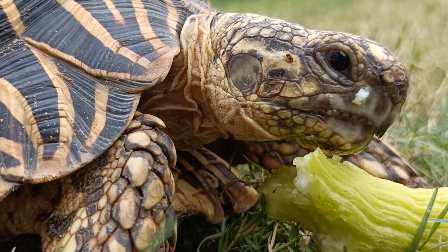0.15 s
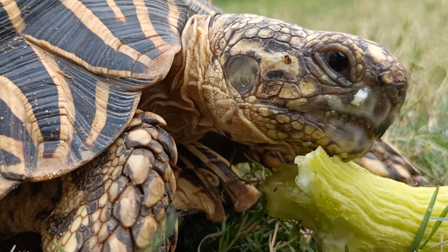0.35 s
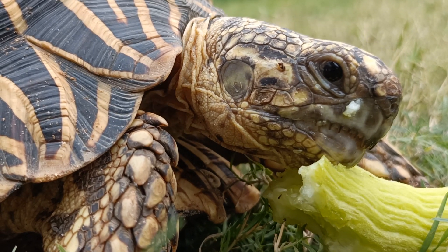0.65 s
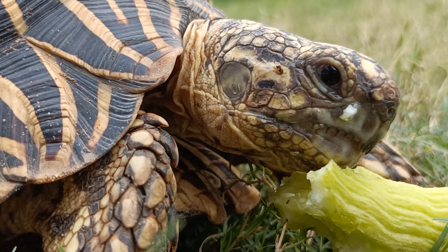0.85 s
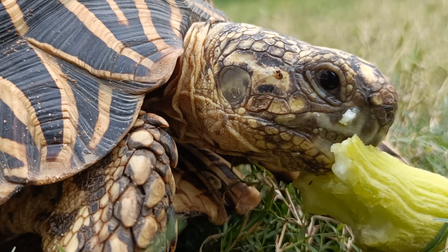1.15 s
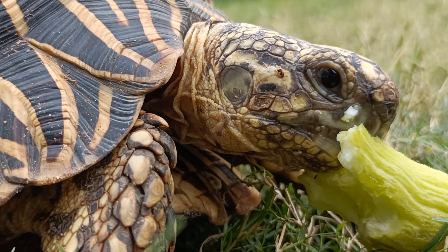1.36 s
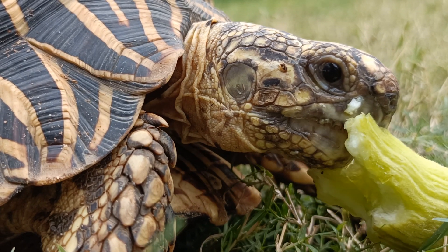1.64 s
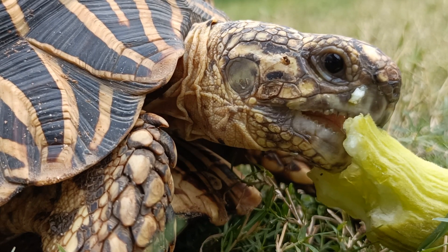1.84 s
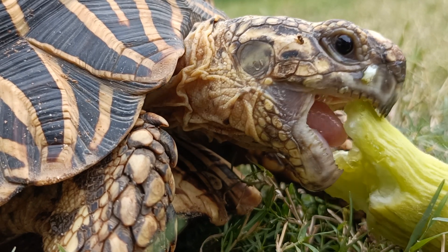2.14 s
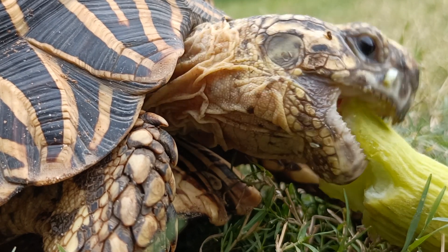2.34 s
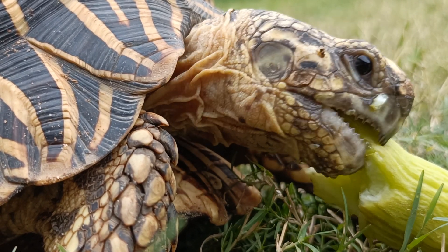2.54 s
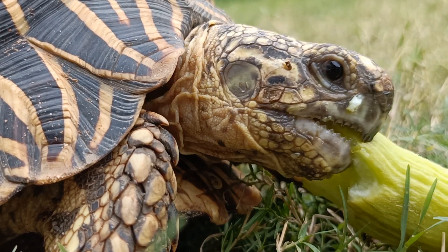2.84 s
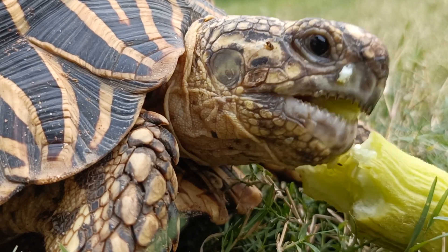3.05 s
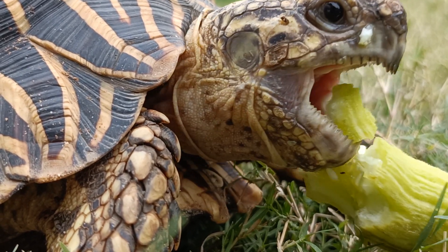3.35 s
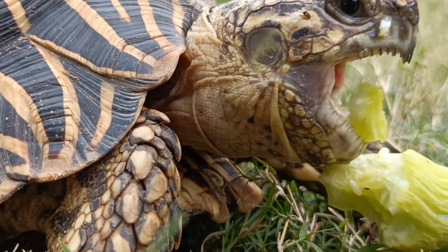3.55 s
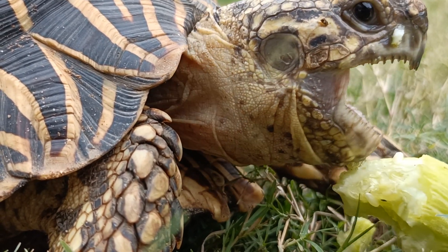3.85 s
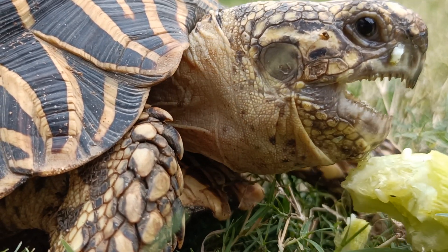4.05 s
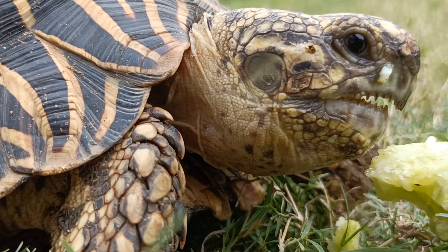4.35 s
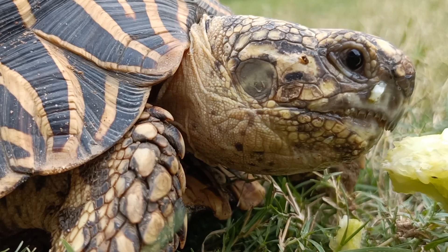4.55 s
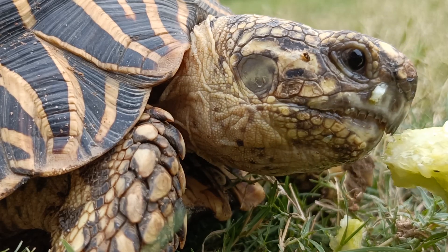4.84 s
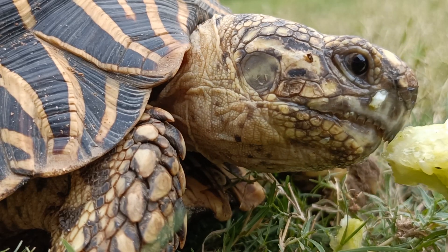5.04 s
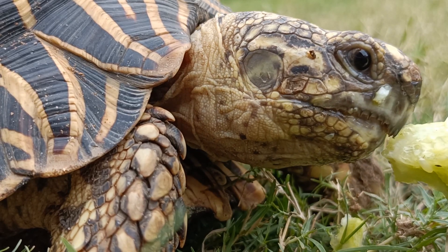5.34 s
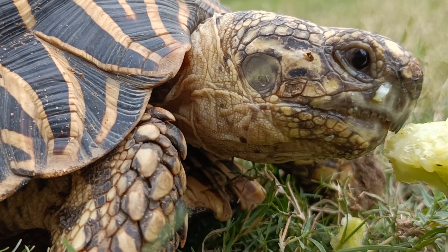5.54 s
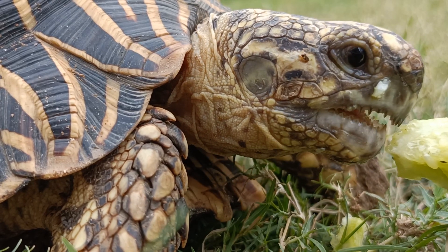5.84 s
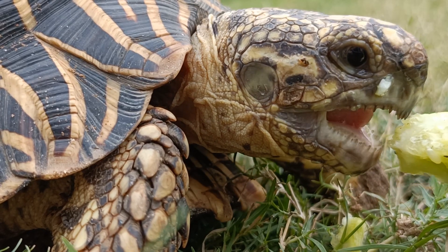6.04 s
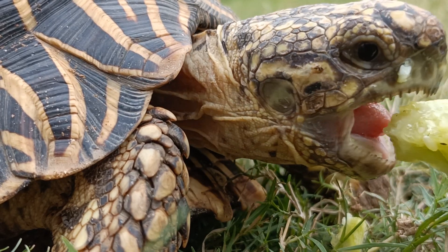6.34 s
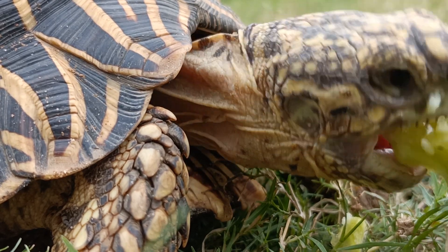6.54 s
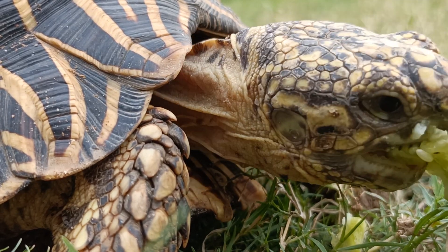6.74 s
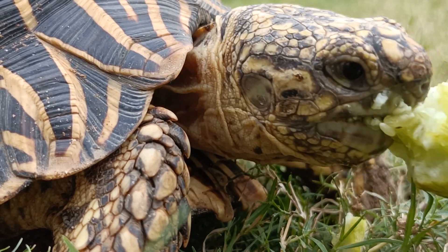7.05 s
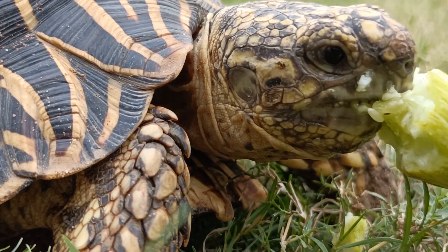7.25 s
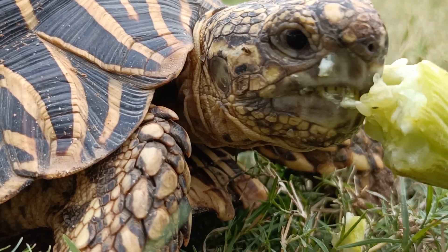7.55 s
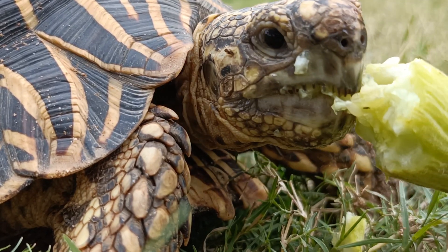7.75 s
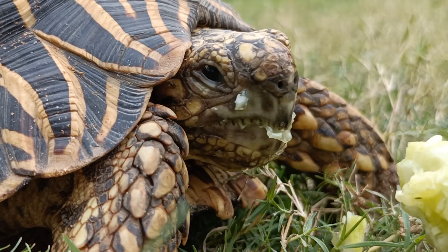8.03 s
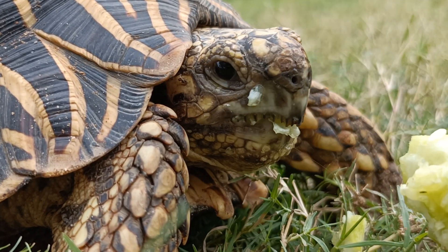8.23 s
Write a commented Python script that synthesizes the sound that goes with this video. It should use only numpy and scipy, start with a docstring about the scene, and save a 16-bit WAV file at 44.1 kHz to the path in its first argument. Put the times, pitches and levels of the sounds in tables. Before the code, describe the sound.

A tortoise bites into cucumber right in front of a microphone lying in the grass. At first, stems crackle and tick against the microphone on the right, with a few soft bumps. A sharp, snapping bite comes about three seconds in, followed by more grass ticks and a second, slightly longer crunch near seven seconds. Parrot-like birds squawk in distant trees over a faint swelling hiss and a low outdoor rumble.

```python
"""Tortoise eating cucumber on a lawn

A camera lies in the grass, its two microphone ports right in front of a tortoise that takes two bites.
Each bite is a short run of snaps that ring in the mouth. Stems tick and crackle against the camera,
which gets a few soft bumps. Farther off, parrot-like birds squawk in the trees, and behind it all
a high hiss swells and fades over a low outdoor rumble."""
import sys
import numpy as np
from scipy import signal
from scipy.fft import rfft, irfft, next_fast_len
from scipy.io import wavfile
from scipy.ndimage import uniform_filter1d

SR = 44100
rng = np.random.default_rng(int(sys.argv[2]) if len(sys.argv) > 2 else 0)


def inscribe(sig):
    """Save sig as 16-bit PCM at rate SR to the path in sys.argv[1].

    A 1-D sig is mono; a 2-D sig holds one channel per row.
    Samples are clipped to [-1, 1] before scaling.
    """
    pcm = np.round(np.clip(np.atleast_2d(sig).T, -1, 1) * 32767)
    wavfile.write(sys.argv[1], SR, pcm.astype(np.int16))


N = 369999


def gain_of(db):
    """Decibels to a factor."""
    return 10 ** (np.asarray(db) / 20)


def unit_rms(x):
    """Scales to rms 1."""
    return x / np.sqrt(np.mean(x ** 2) + 1e-20)


def spectrum_at(points, hz):
    """Reads a spectrum on a log-frequency axis."""
    f, value = np.transpose(points)
    return np.interp(np.log(hz + 1), np.log(f + 1), value)


def envelope(curve):
    """A curve of (time [s], level [dB]) as a gain for every sample."""
    return gain_of(np.interp(np.arange(N) / SR, *np.transpose(curve)))


def add(mix, s, sound):
    """Adds a sound to the mix at time s."""
    part = mix[..., max(round(s * SR), 0):][..., :sound.shape[-1]]
    part += sound[..., :part.shape[-1]]


def panned(balance_db):
    """Gains at the two microphone ports; a positive balance favours the left."""
    return unit_rms(gain_of([[balance_db / 2], [-balance_db / 2]]))


def coloured(x, points, size=4096):
    """Causal (minimum-phase) filter with the given spectrum."""
    log_gain = np.log(gain_of(spectrum_at(points, abs(np.fft.fftfreq(size, 1 / SR)))))
    taps = np.fft.ifft(np.exp(np.conj(signal.hilbert(log_gain)))).real[:size // 2]
    return signal.fftconvolve(x, taps[None], axes=1)[:, :x.shape[1]]


def drift(count, per_s):
    """A smooth random curve of rms 1 that changes about per_s times a second."""
    width = max(int(SR / per_s), 1)
    return unit_rms(uniform_filter1d(uniform_filter1d(rng.standard_normal(count), width), width))


def swell(width_s):
    """A smooth rise and fall, from three half widths before its middle to three after."""
    return np.exp(-np.linspace(-3, 3, int(6 * width_s * SR)) ** 2 / 2)


def slips(per_s, spread_db):
    """Tiny clicks of very uneven size, at rms 1."""
    size = gain_of(spread_db * np.minimum(rng.exponential(1, N), 3)) * rng.choice([-1, 1], N)
    return unit_rms(size * (rng.random(N) < per_s / SR))


def crack(decay_s, tilt_db, splinters, size=1024):
    """One break and a dying spray of smaller ones, with the energy of 1 ms at rms 1."""
    t = np.arange(size) / SR
    spray = rng.standard_normal((2, size)) * np.exp(-t / decay_s)
    burst = splinters * spray / np.linalg.norm(spray, axis=1, keepdims=True)
    burst[:, 2] += 1  # the break itself
    burst = coloured(burst, [(500, 0), (16000, 5 * tilt_db)], size=512)  # tilt_db per octave
    return unit_rms(burst) * np.sqrt(SR / 1000 / size)


def knock(modes, tilt_db, pivot_hz):
    """Quickly damped modes, each with a little scuff; a harder blow favours those above the pivot."""
    t = np.arange(SR // 5) / SR
    out = np.zeros(len(t))
    for hz, db, decay_s in modes:
        pole = np.exp(-2 * np.pi * hz / SR)
        scuff = unit_rms(signal.lfilter([1], [1, -pole], rng.standard_normal(len(t))))
        strength = gain_of(db + tilt_db * np.log2(hz / pivot_hz))
        out += strength * (np.sin(2 * np.pi * hz * t) + 0.64 * scuff) * np.exp(-t / decay_s)
    return out


# Spectral shapes of the distant rumble and of the open air: (frequency [Hz], relative density [dB])
RUMBLE_SPECTRUM = [(12, -72), (20, -20), (37, -2), (57, -2.5), (87, -6), (108, -6), (174, -8), (202, -8.5),
                   (242, -9), (280, -15.5), (504, -16), (584, -22), (783, -22.5), (1600, -41.5),
                   (2080, -130), (3520, -120)]
AIR_SPECTRUM = [(200, -48), (900, 9.5), (2200, 4), (3500, 6.5), (5500, -35), (8000, -31), (12000, -43),
                (16000, 4)]
# How alike that background is at the two ports: (frequency [Hz], correlation [0-1])
PORT_COHERENCE = [(30, 0.96), (130, 0.89), (260, 0.89), (520, 0.37), (1000, 0.033), (2000, 0.017),
                  (5000, 0.039)]

def outdoors():
    """Distant rumble, its lows nearly alike at both ports, a faint wavering hum and thin air noise."""
    size = next_fast_len(N, real=True)
    hz = np.fft.rfftfreq(size, 1 / SR)
    left, independent = rfft(rng.standard_normal((2, size)))
    coherence = spectrum_at(PORT_COHERENCE, hz)
    field = np.array([left, coherence * left + np.sqrt(1 - coherence ** 2) * independent])
    rumble = unit_rms(irfft(field * gain_of(spectrum_at(RUMBLE_SPECTRUM, hz)), size)[:, :N])
    air = unit_rms(irfft(field * gain_of(spectrum_at(AIR_SPECTRUM, hz)), size)[:, :N])
    hum_hz, hum_level = 62.7, gain_of(-56.5) * (1 + 0.5 * drift(N, per_s=8.2))
    hum = hum_level * np.sin(2 * np.pi * hum_hz * np.arange(N) / SR + 0.41 * drift(N, per_s=2.3))
    return (gain_of(-48.5) * rumble + hum) * panned(-0.092) + gain_of(-67) * air


# Faint hollow swells from far off: (middle [s], half width [s], frequency [Hz], level [dB])
FAR_SWELLS = [(2.08, 0.052, 795, -63.5), (2.359, 0.083, 1497, -69), (3.18, 0.094, 651, -61),
              (5.85, 0.13, 479, -63), (6.22, 0.19, 518.5, -60.5)]

def far_tones():
    """Narrow bands of noise that rise out of the rumble and sink back, dead centre."""
    out = np.zeros(N)
    for s, width_s, hz, db in FAR_SWELLS:
        shape = swell(width_s)
        wobble = drift(len(shape), per_s=230) + 1j * drift(len(shape), per_s=230)
        band = (wobble * np.exp(2j * np.pi * hz * np.arange(len(shape)) / SR)).real
        add(out, s - 3 * width_s, gain_of(db) * shape * band)
    return out


# Swells of background hiss: (middle [s], half width [s], relative level [dB])
HISS_SWELLS = [(.02, 0.047, -67.5), (.62, 0.068, -69), (1.12, 0.053, -72.5), (2.6, 0.096, -80),
               (3.33, 0.11, -63.5), (4.04, 0.072, -64.5), (4.849, 0.15, -63.5), (5.75, 0.12, -63.5),
               (6.74, 0.11, -62.5)]
# Colour of the hiss: (frequency [Hz], gain [dB])
HISS_SPECTRUM = [(300, 5), (1500, -4), (2200, 3), (3000, 5), (4500, 5), (6500, -0.5), (9000, -1),
                 (12000, -8), (16000, -15)]

def hiss():
    """A smooth high hiss, wide across both ports, that swells and fades about once a second."""
    level = np.full(N + SR, gain_of(-87.5))  # a second of lead-in lets the first swell start early
    for s, width_s, db in HISS_SWELLS:
        add(level, 1 + s - 3 * width_s, gain_of(db) * swell(width_s))
    noise = coloured(rng.standard_normal((2, N)), HISS_SPECTRUM)
    return gain_of(9.5) * panned(0.81) * level[SR:] * noise


def tree_echoes(x, t60_s):
    """Scattered echoes from trees and walls: sparse taps that die away, different at each port."""
    t = np.arange(SR) / SR
    taps = rng.standard_normal((2, SR)) * (rng.random((2, SR)) < 1500 / SR)
    early, tail = 1.07 * np.exp(-t / 0.052), gain_of(-60 * t / t60_s)
    taps *= (early + tail) * (t > 0.004)
    return signal.fftconvolve(x, taps / np.linalg.norm(taps, axis=1, keepdims=True), axes=1)[:, :N]


# Resonances of a bird's throat: (frequency [Hz], gain [dB])
THROAT_SPECTRUM = [(1400, -16.5), (2100, 3.5), (2550, 13), (3150, 6), (4100, 11), (5050, 2.5), (6400, -9),
                   (8200, -13.5), (9600, -13), (11000, -24), (14000, -31)]

def bird_note(length_s, last_hz, fall_octaves, rough, bright_db, sag_octaves_per_s=0):
    """A harmonic note that starts high, drops unevenly and levels off while it grows louder."""
    drop_s, rise_db = 0.039, 3.5
    count = int(length_s * SR)
    t = np.arange(count) / SR
    octaves = fall_octaves * np.exp(-(t / drop_s) ** 2) + sag_octaves_per_s * (length_s - t)
    shake = 0.024 * drift(count, per_s=700) + 0.022 * drift(count, per_s=130)
    waver = 0.00906 * drift(count, per_s=140)
    hz = last_hz * 2 ** octaves * (1 + rough * shake + waver)
    phase = 2 * np.pi * np.cumsum(hz) / SR
    voice = np.zeros(count)
    for k in range(1, 7):
        voice += gain_of(spectrum_at(THROAT_SPECTRUM, k * hz) + bright_db * min(k, 3)) * np.sin(k * phase)
    rasp = 1 + rough * drift(count, per_s=1500)
    rise = gain_of(rise_db * (t / length_s) ** 2)
    return unit_rms(voice * rasp * rise) * signal.windows.tukey(count, 0.3)


# Thin whistles from the trees, often leading into a squawk:
# (time [s], length [s], last pitch [Hz], fall [octaves], relative level [dB])
BIRD_WHISTLES = [(.437, .04, 3123, 0.069, -50), (0.471, .024, 2783, .15, -38),
                 (1.674, 0.044, 2540, 0.33, -50), (2.33, 0.13, 3230, 0.031, -69),
                 (3.171, 0.049, 2127, .07, -58), (4.575, 0.041, 2780, 0.064, -62),
                 (5.598, 0.092, 2110, .08, -64), (5.846, 0.074, 2090, 0.081, -58.5),
                 (6.336, .09, 2090, 0.057, -65), (7.693, 0.015, 2790, 0.152, -54)]
# Harsh squawks from the trees: (time [s], length [s], last pitch [Hz], fall [octaves],
# relative level [dB], roughness [factor], brightness [dB per partial, up to the third])
BIRD_SQUAWKS = [(0.488, 0.12, 1964, 0.2, -45, 0.53, 3), (1.719, .075, 1569, 0.23, -45, 0.2, 0),
                (3.548, 0.11, 1633, 0.18, -59, 0.74, -1), (4.084, 0.15, 1620, 0.46, -53, 1.03, -0.5),
                (4.339, .1, 1617, 0.4, -53.5, .75, -0.5), (4.601, 0.15, 1614, 0.31, -56.5, 0.8, -1),
                (5.086, 0.14, 1486, 0.32, -57, 0.65, -6.5), (5.364, 0.1, 1610, .35, -60.5, 1.06, -1),
                (5.61, 0.086, 2078, 0.052, -59, 0.93, 6), (5.87, 0.096, 1618, .34, -57, 0.77, 0.5),
                (6.367, 0.082, 1586, .23, -66, .5, -5), (6.93, 0.1, 1710, 0.42, -56, 0.74, 1),
                (7.203, 0.11, 1600, 0.34, -57, 0.86, -1.5), (7.462, .135, 1558, 0.28, -56, 0.63, -1.5),
                (7.705, 0.11, 1650, 0.24, -52.5, 0.66, 1), (7.949, 0.094, 1755, .18, -53, 0.7, 1),
                (8.212, 0.075, 1694, 0.38, -56, 0.88, 3)]

def birds():
    """Calls in the trees; fainter birds are farther off and mostly echo, their whistles duller."""
    direct, scattered = np.zeros((2, 1, N))
    calls, nearest_db = [], max(row[-1] for row in BIRD_WHISTLES)
    for s, length_s, hz, fall, db in BIRD_WHISTLES:
        fainter_db = nearest_db - db
        rough, bright_db = 0.13 + 0.024 * fainter_db, -1.5 - 0.7 * fainter_db
        calls.append((s, db, bird_note(length_s, hz, fall, rough, bright_db)))
    for s, length_s, hz, fall, db, rough, bright_db in BIRD_SQUAWKS:
        calls.append((s, db, bird_note(length_s, hz, fall, rough, bright_db, sag_octaves_per_s=0.55)))
    for s, db, call in calls:
        add(direct, s, gain_of(db - 0.27 * (nearest_db - db)) * call)
        add(scattered, s, gain_of(db) * call)
    return (direct + gain_of(1.0) * tree_echoes(scattered, t60_s=0.87)) * panned(0.65)


# Pressure on the grass around the camera, heard as rustle: (time [s], relative level [dB])
GRASS_PRESSURE = [(0, -58), (.36, -57), (.85, -65), (1.2, -60.5), (1.5, -66), (2.35, -64), (3.35, -64.5),
                  (3.5, -53), (3.85, -61), (4.85, -59.5), (5.25, -73), (5.5, -75), (5.75, -64), (6.25, -72),
                  (7.2, -58.5), (7.45, -66), (7.95, -60.5), (8.39, -67.5)]
# Colour of blades and stems right at the microphone: (frequency [Hz], gain [dB])
GRASS_SPECTRUM = [(100, -1), (600, -1), (1500, -2.5), (2600, 3), (4500, -0.5), (6400, 1), (9000, -4.5),
                  (16000, -9.5)]

def rustle():
    """Grass blades shift all the time, mostly at the right port: short gritty ticks over a fine fizz."""
    tick_decay_s = 0.0006
    blows = slips(per_s=380, spread_db=4.2) ** 2
    energy = signal.lfilter([1], [1, -np.exp(-1 / (tick_decay_s * SR))], blows)
    grit = unit_rms(np.sqrt(energy) * rng.standard_normal(N))
    fizz = 0.65 * rng.standard_normal((2, N))
    return gain_of(1.5) * panned(-17) * coloured((grit + fizz) * envelope(GRASS_PRESSURE), GRASS_SPECTRUM)


# Scrapes in the grass on the right: (time [s], length [s], relative level [dB], left minus right [dB])
GRASS_SCRAPES = [(0.046, 0.14, -57.5, -14), (2.181, 0.14, -67, -23), (3.472, 0.37, -69, -32),
                 (7.803, 0.027, -50.5, -13), (7.926, 0.17, -56.5, -8.5)]

def scrapes():
    """Dense runs of slips as something drags through the grass."""
    out, grains = np.zeros((2, N)), slips(per_s=1100, spread_db=4.5)
    for s, length_s, db, balance_db in GRASS_SCRAPES:
        count = int(length_s * SR)
        run = unit_rms(grains[int(s * SR):][:count]) + 0.82 * rng.standard_normal((2, count))
        add(out, s, gain_of(db) * panned(balance_db) * run * signal.windows.tukey(count, 0.6))
    return coloured(out, [(200, 19), (1000, 4), (3000, 12), (6500, 5.5), (10000, 0.5), (16000, -3)])


def flick(tilt_db):
    """One stem lets go: a crack and a brief ring at a pitch of its own, weaker if the crack is dull."""
    snap = crack(decay_s=0.0029, tilt_db=tilt_db, splinters=1.9)
    t = np.arange(snap.shape[1]) / SR
    ring_hz, ring_decay_s = 6230 * 2 ** (0.15 * rng.standard_normal()), 0.0014
    ring = np.sin(2 * np.pi * ring_hz * t) * np.exp(-t / ring_decay_s)
    return snap + gain_of(-3.5 + min(tilt_db, 0)) * ring


# The strongest flicks, close to the right port: (time [s], relative level [dB], tilt [dB per octave])
STEM_FLICKS = [(0.0114, -33, 14), (0.0517, -32, 2), (0.0714, -26, -6), (0.0885, -33, -6.5),
               (0.1052, -29, -4), (0.149, -31, -3), (0.2384, -37, -3.5), (0.2653, -37, -1.5),
               (0.3286, -34.5, -1), (0.3541, -35.5, 1), (0.401, -37.5, -1), (1.017, -39.5, 9),
               (1.168, -39, -0.5), (2.0486, -40, -4), (2.2663, -33.5, -4.5), (2.359, -38, -3),
               (2.84, -41.5, -2), (2.876, -38, -4), (3.5058, -18.5, 4.5), (3.6239, -30, 7),
               (3.6654, -32, -2), (3.674, -34, 2), (3.693, -28.5, -1), (3.772, -36, -2), (4.2775, -36, 2),
               (5.2403, -34.5, -3.5), (6.128, -46.5, 4), (6.1988, -38, 2.5), (7.2004, -35.5, -1),
               (7.314, -35.5, 6), (7.3887, -36, 0.5), (7.8167, -33.5, -5), (8.056, -28.5, 0.5),
               (8.101, -37, -1)]

def stems():
    """Stems slip and flick against the camera; lesser ones come at random, louder under more pressure."""
    flicks_per_s, over_rustle_db, spread_db = 12, 16, 2.5
    out, pressure = np.zeros((2, N)), envelope(GRASS_PRESSURE)
    for s, db, tilt_db in STEM_FLICKS:
        add(out, s, gain_of(db) * flick(tilt_db))
    for when, size, tilt in rng.uniform(-1, 1, (int(flicks_per_s * N / SR), 3)):
        at = int((when + 1) / 2 * N)
        add(out, at / SR, pressure[at] * gain_of(over_rustle_db + spread_db * size) * flick(5 * tilt))
    return gain_of(-3.5) * panned(-16.5) * coloured(out, GRASS_SPECTRUM)


# Nudges, dull if soft and bright if hard: (time [s], relative level [dB], tilt [dB per octave])
CAMERA_NUDGES = [(.01, -34, 0), (0.055, -26, -2), (0.401, -38, 0), (.562, -50, 10), (.614, -46, 10),
                 (2.186, -42, 6.5), (3.625, -46, -8), (7.82, -36.5, -4.5)]
# Modes of the body that holds the microphones: (frequency [Hz], relative level [dB], decay [s])
CAMERA_MODES = [(67, -10.5, 0.028), (255, -2.5, 0.0059), (370, -6.5, 0.0044), (1230, -8, 0.00067)]

def camera_bumps():
    """Nudges ring the body of the camera, heard almost wholly at the right port."""
    out = np.zeros(N)
    for s, db, tilt_db in CAMERA_NUDGES:
        add(out, s, gain_of(db) * knock(CAMERA_MODES, tilt_db, pivot_hz=298))
    return panned(-25) * out


# The beak breaks through: (time [s], knock level [dB], knock tilt [dB per octave], crumble level [dB])
JAW_CLOSINGS = [(2.9781, -40, 3, -52), (6.9791, -26, 2, -63)]
# Modes of the jaw: (frequency [Hz], relative level [dB], decay [s])
JAW_MODES = [(497, -27, .0022), (795, -2.5, 0.0019), (1310, -2, 0.0017), (2730, 5.5, 0.00033)]
# Colour of breaking cucumber at close range: (frequency [Hz], gain [dB])
CUCUMBER_SPECTRUM = [(2500, -4), (3800, -1), (5500, 1.5), (6800, -2), (8200, 0.5), (9500, -3.5),
                     (12000, 0.5), (14000, -11), (16000, -21)]

def jaw():
    """As the beak breaks through, the jaw knocks shut and small cells crumble for a moment."""
    crumble_s = 0.076
    knocks, crumbs = np.zeros((2, 2, N))
    breaks = slips(per_s=2800, spread_db=5.5)
    cells = signal.oaconvolve(breaks[None], crack(decay_s=0.00017, tilt_db=0, splinters=3.3), axes=1)
    for s, knock_db, tilt_db, crumble_db in JAW_CLOSINGS:
        add(knocks, s, gain_of(knock_db) * panned(-1) * knock(JAW_MODES, tilt_db, pivot_hz=800))
        add(crumbs, s, gain_of(crumble_db) * unit_rms(cells[:, int(s * SR):][:, :int(crumble_s * SR)]))
    return knocks + coloured(crumbs, CUCUMBER_SPECTRUM)


# The flesh breaks right in front of the microphones: (time [s], crack level [dB], crack decay [s],
# tilt [dB per octave], mouth ring level [dB], crack left minus right [dB])
CUCUMBER_SNAPS = [(2.5124, -42, 0.00096, 1, -66, -9), (2.523, -43, 0.0013, -1, -56, 8),
                  (2.97, -37, .00036, 3, -45, 5), (2.9771, -18.5, 0.00079, 6, -20.5, 0),
                  (2.9936, -16.5, 0.00024, 2.5, -44, 2), (3.0385, -37, 0.0012, 5, -62, -5),
                  (6.9787, -21.5, 0.0017, -3.5, -19.5, 0), (6.9888, -32, .001, -3, -50, -8),
                  (7.0072, -39, 0.00054, -4, -40, 3), (7.0208, -35, .0008, -1.5, -48, -7),
                  (7.0327, -30, 0.0021, -2, -36, -9), (7.0464, -31.5, 0.00099, 2, -43, -7),
                  (7.0700, -39, 0.0053, -1.5, -35, -5), (7.929, -35.5, 0.005, 3, -44, -4)]
# The hollow of the mouth rings lower as the beak sinks in: (time [s], frequency [Hz])
MOUTH_PITCH = [(2.51, 2400), (2.96, 1790), (3.04, 1770), (6.98, 2050), (7.02, 1610), (7.08, 1280),
               (7.93, 1700)]

def cucumber_snaps():
    """The flesh cracks and rings the hollow of the mouth; shell and ground throw back a faint patter."""
    ring_decay_s, right_delay_s = 0.0026, 0.0001  # the ring reaches the right port later
    out = np.zeros((2, N))
    for s, db, decay_s, tilt_db, ring_db, balance_db in CUCUMBER_SNAPS:
        snap = crack(decay_s, tilt_db, splinters=6.6)
        patter = gain_of(-19) * crack(decay_s=0.007, tilt_db=tilt_db - 1, splinters=3)
        t = np.maximum(np.arange(snap.shape[1]) / SR - [[0], [right_delay_s]], 0)
        mouth_hz = np.interp(s, *np.transpose(MOUTH_PITCH))
        ring = np.sin(2 * np.pi * mouth_hz * t) * np.exp(-t / ring_decay_s)
        add(out, s, gain_of(db) * panned(balance_db) * (snap + patter) + gain_of(ring_db) * ring)
    return coloured(out, CUCUMBER_SPECTRUM)


def scene():
    """Everything that reaches the two ports, down in the grass."""
    tortoise = cucumber_snaps() + jaw()
    at_camera = stems() + rustle() + scrapes() + camera_bumps()
    background = birds() + hiss() + far_tones() + outdoors()
    return background + at_camera + tortoise


# Each microphone port has its own resonance: (frequency [Hz], gain [dB])
LEFT_RESPONSE = [(2000, -1), (4500, -2.5), (6100, -6.5), (7100, 2), (7700, 10.5), (8150, 13.5), (8900, 7),
                 (10000, 2.5), (11800, -3.5), (12900, -1), (14200, -21), (16000, -14)]
RIGHT_RESPONSE = [(2000, 0), (4000, -2), (5300, 2), (5900, 2.5), (6550, 8), (7300, 1), (8100, -13),
                  (10000, -8.5), (12000, -7), (14000, 1.5), (16000, -1)]

def record(dry):
    """The camera's microphones: each port colours its channel, and the highest treble is cut off."""
    heard = np.vstack([coloured(dry[:1], LEFT_RESPONSE), coloured(dry[1:], RIGHT_RESPONSE)])
    lowpass = signal.firwin(511, cutoff=15900, window=("kaiser", 9), fs=SR)
    return signal.oaconvolve(heard, lowpass[None], "same")


dry = scene()
out = record(dry)
inscribe(out)
```